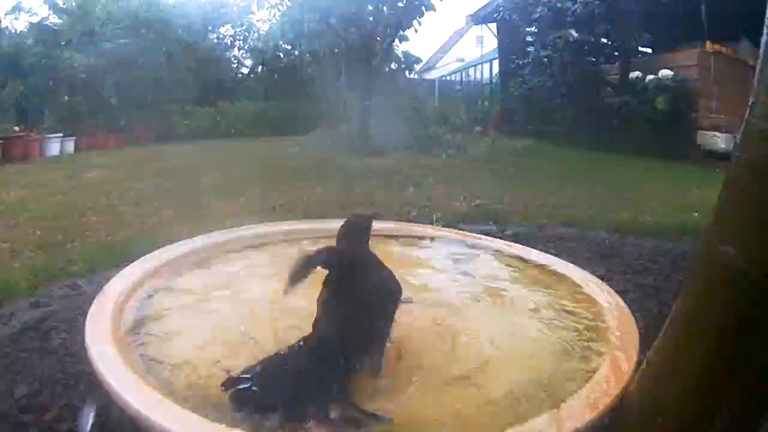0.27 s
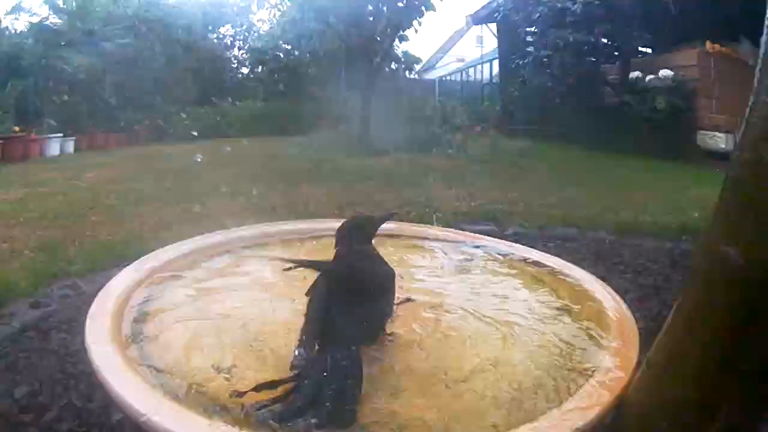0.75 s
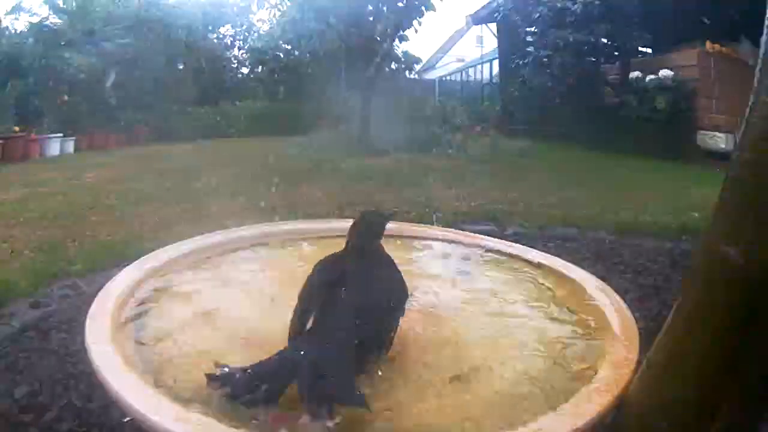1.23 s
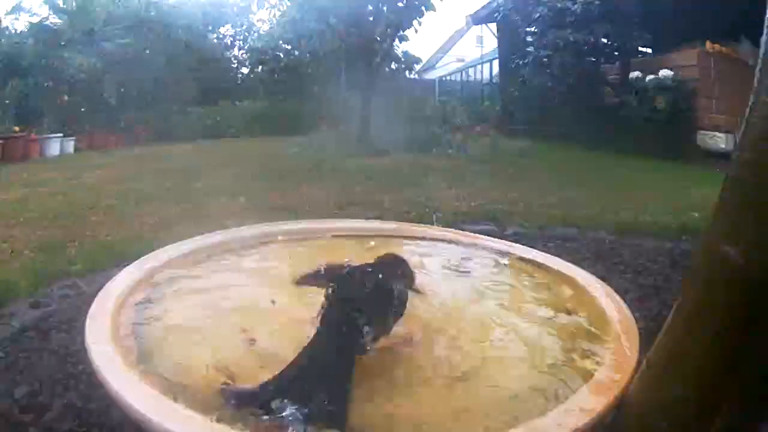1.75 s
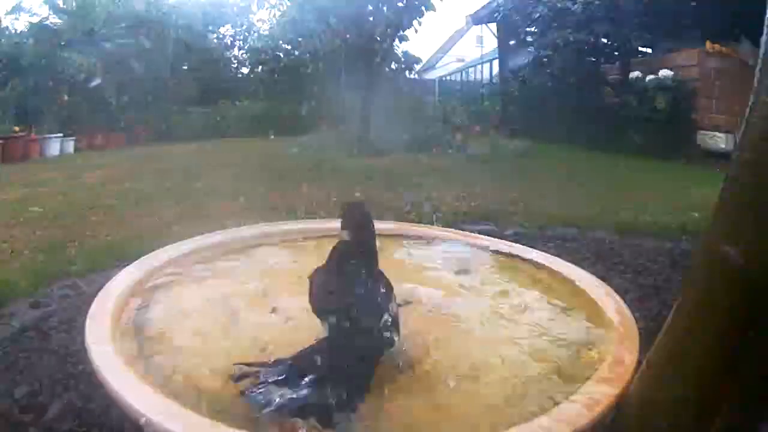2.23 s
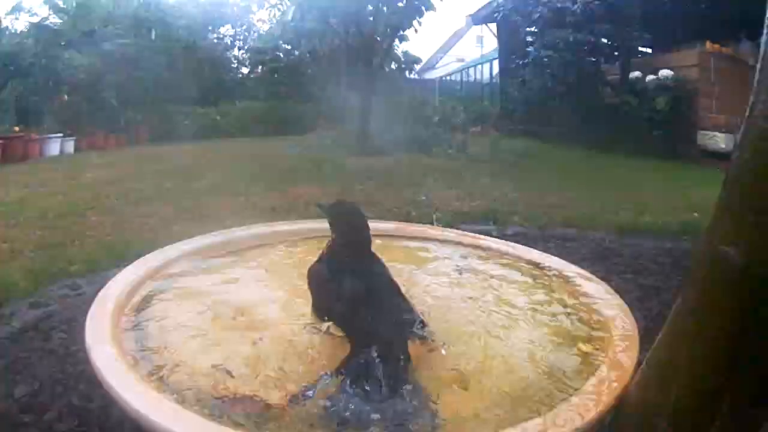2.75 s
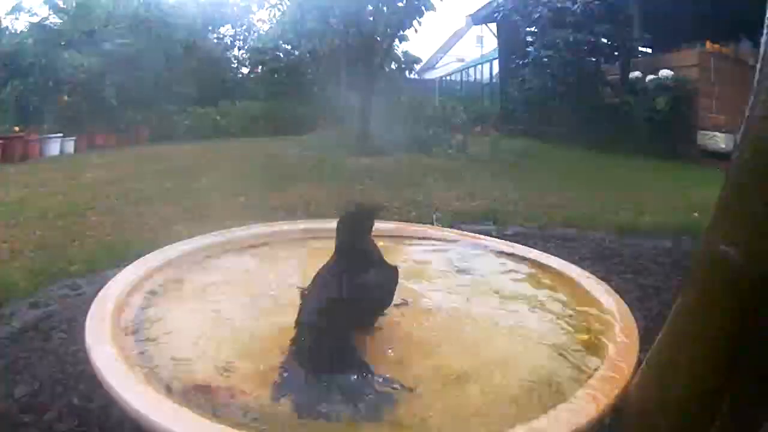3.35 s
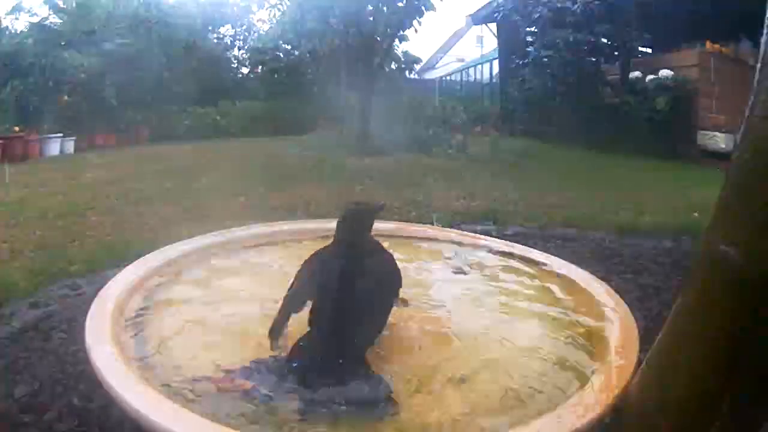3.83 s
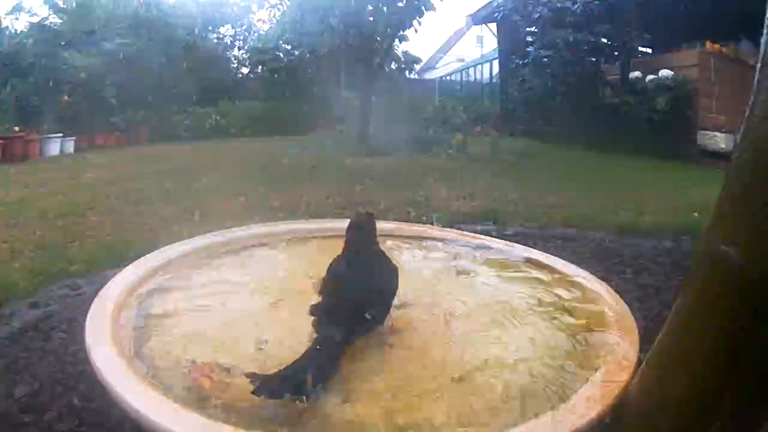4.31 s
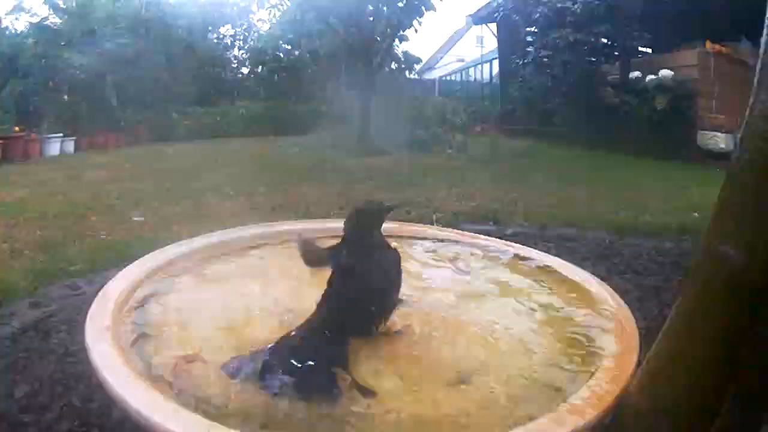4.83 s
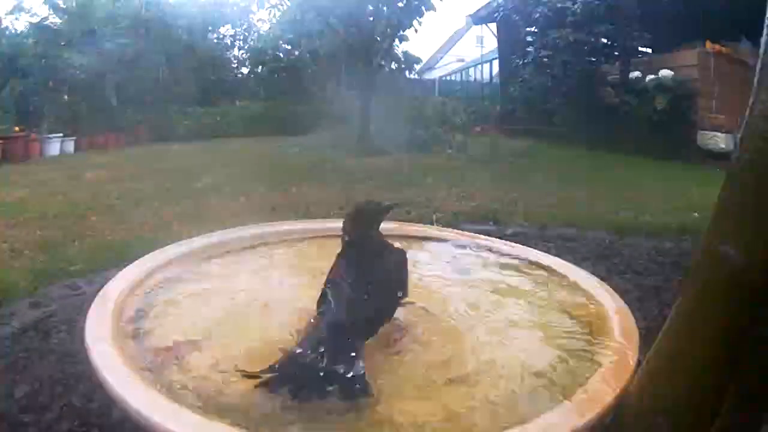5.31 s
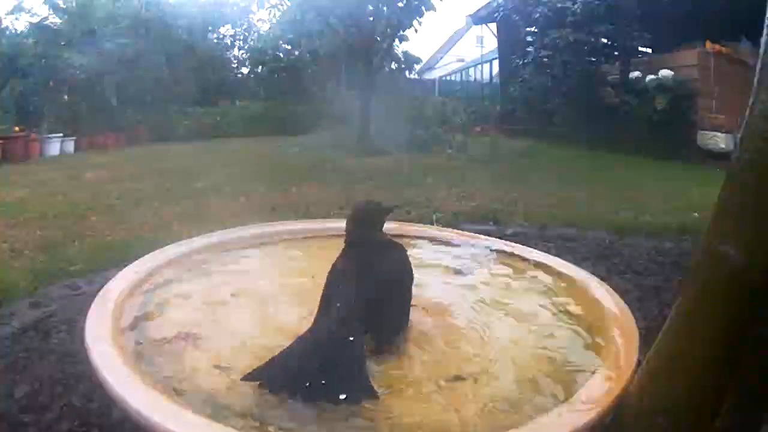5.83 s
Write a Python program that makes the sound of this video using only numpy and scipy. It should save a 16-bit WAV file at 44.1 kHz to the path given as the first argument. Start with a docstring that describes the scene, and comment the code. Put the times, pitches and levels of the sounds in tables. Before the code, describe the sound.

Light rain hisses and patters over a faint low outdoor rumble. Very near, wet feathers beat the water about ten or more times a second, crackling with droplets, pausing briefly, then returning harder with soft puffs of air on the microphone and six clipped, rough chirps. A short lull holds one dull tap of a drop on the housing before a last lighter flurry fades into rain.

```python
"""A shallow dish in a garden, in light rain, with a small outdoor camera's microphone close by.
A dark bird bathes: wet wings slap (shaped noise bursts), throw spray (clumpy noise), push air at
the microphone (single pressure swings) and leave bubbles (rising damped sines). It gives short
two-voiced 'chook' calls (two gliding sines that couple). Rain hisses and patters behind, one drop
hits the housing, and a low rumble with a faint hum lies in the distance."""
import sys
import numpy as np
from scipy import signal
from scipy.fft import rfft, irfft
from scipy.io import wavfile
from scipy.ndimage import uniform_filter1d

SR = 44100
rng = np.random.default_rng(int(sys.argv[2]) if len(sys.argv) > 2 else 0)


def store_pcm(level_fs):
    """Save levels as 16-bit WAV."""
    pcm = np.round(np.clip(level_fs, -1, 1) * 32767).astype(np.int16)
    wavfile.write(sys.argv[1], SR, np.atleast_2d(pcm).T)


def voltage_ratio(level):
    """Linear amplitude factor for a level in decibels (scalar or array-like)."""
    return 10 ** (np.asarray(level, float) / 20)


N = 267246  # samples

# Wing slaps: t/s, level/dB of the slap's energy packed into 1 ms, centre f/Hz, spread/octaves, decay/ms
SLAPS = [(.113, -26, 4920, 0.56, 5), (0.1327, -34, 5000, .7, 0.69), (.202, -18.5, 5670, 0.75, 8),
         (0.213, -28.5, 4150, 1.6, 2.1), (.297, -26, 4250, 0.61, 1.5), (0.3758, -19, 4900, 0.23, 3),
         (0.3866, -27.5, 6030, .7, 4.5), (0.4222, -27.5, 2650, 2.3, 2.6), (0.4572, -21, 4900, 1.1, 1.4),
         (.4779, -18, 5510, 0.79, 0.67), (0.4822, -20.5, 5500, 0.54, 5.9), (0.5817, -23.5, 4690, 1.4, 6.3),
         (0.6775, -20.5, 5250, .7, 4.9), (0.783, -28, 5900, 0.58, 2.2), (0.787, -26.5, 5370, 1.1, 0.8),
         (.885, -27, 4580, 0.87, 0.84), (0.9264, -31.5, 2200, 0.89, 1.2), (0.99, -26.5, 2470, 0.5, .55),
         (1.1204, -23, 4850, 1.2, 2.7), (1.211, -18.5, 4570, 0.69, 1.1), (1.2176, -26, 4100, 0.84, 0.54),
         (1.276, -28.5, 2970, 1, 2.7), (1.2835, -22.5, 5000, 0.6, .9), (1.2901, -23, 5230, 0.64, 3.6),
         (1.309, -20, 5070, 0.57, 0.49), (1.312, -23.5, 5290, .65, 6.1), (1.372, -29, 3850, 1.8, 4.9),
         (1.394, -26, 6090, 0.48, 1.2), (1.398, -28.5, 5120, 0.34, 1.5), (1.4215, -24, 3950, 0.63, 2.7),
         (1.4344, -30.5, 4300, 0.19, 4.9), (1.5111, -29.5, 4000, 0.38, .55),
         (1.8119, -26.5, 5290, 0.37, 0.92), (1.8969, -28, 3050, 0.48, .55), (2.0781, -26, 4920, 0.6, 2.4),
         (2.1597, -26, 3680, 0.64, 1.2), (2.175, -25.5, 5150, 0.24, 2.2), (2.2385, -25.5, 5300, .2, 3.5),
         (2.2453, -18.5, 5460, 0.22, 1.2), (2.265, -18.5, 4100, 0.49, 3.8), (2.333, -32, 4660, 0.59, 1.3),
         (2.348, -13, 3960, 1, 0.31), (2.364, -37, 4980, 0.77, 3.2), (2.4175, -24, 5600, 0.23, 2),
         (2.4304, -13, 4320, 1, 1.2), (2.4358, -24, 5600, 0.87, 6.2), (2.509, -13.5, 4560, 0.87, 1.5),
         (2.592, -15, 4040, 0.39, 0.26), (2.5955, -25.5, 5480, 0.93, 2.1), (2.604, -30, 4970, 0.63, 1.6),
         (2.674, -13, 4340, 0.48, 0.76), (2.7623, -18, 4620, 1.2, 3.1), (2.8627, -25, 3560, 0.5, 5.5),
         (2.9872, -26.5, 4260, 0.85, 2.8), (2.992, -23.5, 4300, 0.99, 1.6),
         (3.0706, -17.5, 3260, 0.8, 0.89), (3.075, -20.5, 5130, 0.66, 4.8), (3.087, -19, 4340, 0.77, 1.4),
         (3.11, -30, 1930, 0.51, 1.6), (3.1506, -11, 5540, 1.03, 2.1), (3.1979, -27.5, 4420, 0.32, 1.9),
         (3.2266, -21, 2200, 0.66, 1.4), (3.2342, -14, 5540, 0.88, 3), (3.3231, -18.5, 4900, 0.76, 2.4),
         (3.407, -23, 4900, 1.1, 5), (3.4138, -14.5, 7370, 0.42, 0.64), (3.5078, -18, 4530, 0.82, 0.63),
         (3.5094, -20.5, 4370, .75, 1.5), (3.5327, -30.5, 2370, 0.59, 1.1), (3.8948, -23, 6280, 0.21, 0.61),
         (4.26, -30.5, 1480, 1.2, 1.2), (4.3368, -23, 6500, 0.6, 2), (4.367, -22.5, 3350, 0.26, 2.1),
         (4.4148, -30, 5960, 0.18, .55), (4.5154, -32, 2810, 0.47, 1.3), (4.5995, -18, 4860, 0.94, 2.8),
         (4.6693, -20.5, 5600, 0.51, .55), (4.6911, -23, 4590, .6, 3.7), (4.697, -20.5, 5460, 0.7, 5.9),
         (4.7817, -17, 3780, 0.66, .55), (4.7902, -29, 3630, 0.49, 4.4), (4.8824, -22, 3900, 1.2, 3.5),
         (4.893, -19, 5940, 0.11, 0.6), (4.9965, -28.5, 4400, 1.8, 1.5), (5.0045, -28, 4510, 0.3, 1.2),
         (5.0188, -25.5, 3150, 1.5, 2.4), (5.1102, -20, 3900, 0.85, 1.9), (5.217, -21, 5570, 0.46, 4.3),
         (5.3394, -23.5, 5500, 0.65, 2.6), (5.347, -23.5, 5380, 0.12, .55), (5.3584, -28.5, 3470, 1.2, 1.9),
         (5.478, -29, 4610, 1.5, 1.9), (5.4889, -28.5, 5180, 0.18, 0.65), (5.7062, -26.5, 2510, 0.43, 1.2)]
# The shallow water favours some bands of every slap: f/Hz, relative level/dB
SLAP_COLOUR = [(300, 9), (900, 1), (1800, 4), (3500, -2), (6000, 0.5), (8000, 3)]
RISE_SHARE, SHORTEST_DECAY_MS = .16, .52  # rise time as a share of the decay
# Levels of the three wet parts are energies against their slap
SWISH_DB, SWISH_MS = -12.5, 8.7  # feathers cutting air and water just before the slap
SPRAY_DB, SPRAY_MS, SPRAY_HZ = -12, 6.9, 5370
DRIZZLE_DB, DRIZZLE_MS = -16.5, 49  # thrown water goes on falling a while
PATCHY_DB, PATCH_MS = 5, 1.2  # spray falls in uneven clumps

# Air pushed at the microphone by a wing stroke: t/s mid-swing, nominal level/dB, dip to swell about/ms
WAFTS = [(0.116, -37, 4), (0.295, -39, 3.7), (0.419, -37, 3.6), (2.081, -37, 5), (2.266, -36.5, 2.1),
         (2.348, -39, 4.1), (2.431, -31.5, 2.7), (2.51, -30, 1.97), (2.59, -28, 1.3), (2.673, -31, 3.5),
         (2.76, -35, 3.8), (3.07, -34.5, 2.06), (3.085, -30.5, 1.96), (3.102, -29, 2.4),
         (3.152, -33.5, 3.3), (3.406, -30.5, 4.4), (4.781, -36, 4), (4.882, -41, 2.6), (5.218, -37.5, 1.95)]
SLOSH_DB, SLOSH_HZ, SLOSH_MS = -12.5, 750, 4.4  # water heaved by the same stroke; dB against the waft

# Bubbles ringing in the water: t/s, level/dB before the soft onset, starting f/Hz
BUBBLES = [(0.9898, -30, 2220), (1.216, -27, 3120), (1.269, -25, 3520), (1.277, -25, 2190),
           (1.302, -28, 2540), (1.894, -27, 3830), (2.2426, -27, 2540), (2.264, -19.5, 2990),
           (2.462, -23.5, 2390), (2.805, -30, 3800), (3.108, -19.5, 1500), (3.2252, -17, 1530),
           (4.3678, -28, 3050), (4.691, -25, 2160), (4.8254, -29, 1870), (5.0765, -30.5, 1260),
           (5.3582, -29, 3170), (5.7054, -29.5, 2400)]
BUBBLE_T60_S, BUBBLE_RISE = 0.02, 0.16  # pitch climbs by this share over t60

# Calls: t/s near the top of the lower sweep, level/dB before effort and throat, lower f/Hz at share 1,
# upper f/Hz at share 1, closing flick f/Hz, throat resonance f/Hz
CALLS = [(0.0565, -26.5, 2937, 3770, 3280, 2962), (2.482, -33.5, 2564, 3300, 1750, 2340),
         (2.698, -29.5, 3150, 3450, 2450, 2260), (2.870, -28.5, 2603, 3115, 1450, 2480),
         (3.0536, -26.5, 2664, 2827, 2030, 2460), (3.203, -25, 2726, 3580, 2160, 2500),
         (3.366, -25.5, 2980, 3077, 3000, 2560)]
# Sweep of each side in every call: t/ms from the call's time, share of the way from rest to top, effort level/dB
LOWER_SWEEP = [(-8.5, 0.115, -19), (-5, 0.489, -3.5), (-1.5, 0.878, -1.5), (0.5, 0.98, -1.5),
               (1.5, 0.882, -3), (5, 0.53, 2.5), (9, .2, -6.5), (13.5, .03, -17)]
UPPER_SWEEP = [(-2.5, .6, -10), (3, 0.94, -0.5), (4.5, 0.824, -2), (8.5, 0.47, -7.5), (13, .22, 0),
               (17.5, 0.092, -10.5)]
LOWER_REST_HZ, UPPER_REST_HZ = 1082, 1500
FLICK_MS, FLICK_DB = 22.5, -15  # the upper side flicks, mostly upward, as it closes
# coupling lifts the upper side in mid fall; the lift in Hz is this times the coupling gain
WAVER_HZ, WAVER_MS, WAVER_WIDTH_MS = 3360, 10.8, 2.8
THROAT_WIDTH_HZ, THROAT_DB = 406, 8.5  # a sweep swells as it crosses the resonance
# the sides couple more strongly the wider the beak, that is the higher the resonance
COUPLING_DB, COUPLING_DB_PER_KHZ, COUPLING_AT_HZ = -24.5, 24.5, 2480
AIR_DB, AIR_HZ = -24.5, 4100  # air noise through the beak
JITTER, RASP_DB = .01, 1.8  # fast unsteadiness of pitch (share) and of level

# Drop that hits the camera housing: t/s, push level/dB before recovery, push/ms, recovery f/Hz
HOUSING_DROPS = [(4.2884, -16.5, 1.05, 130)]

# Rain at the microphone: t/s, level/dB
RAIN = [(0.0, -42), (3.0, -42.5), (6.06, -42.5)]
# Spectrum of the far hiss: f/Hz, relative level/dB per Hz
RAIN_COLOUR = [(290, -44.5), (500, -10.5), (900, -2.5), (1600, -2.5), (3000, -3), (6100, -5), (7000, -5.5)]
PATTER_PER_S, PATTER_DB, PATTER_SCATTER_DB = 500, -6.5, 5  # patter level against the hiss
LOUDEST_SHARE = .09  # caps the largest drops

# Spectrum of the distant rumble: f/Hz, relative level/dB per Hz
RUMBLE_COLOUR = [(12, -44), (20, -2), (70, 3), (151, -3.5), (199, -6.5), (248, -6), (376, -10.5),
                 (800, -11.5), (1040, -34), (1760, -120)]
RUMBLE_DB = -52.5
HUM_HZ, HUM_WIDTH_HZ, HUM_DB = 198.4, 3.2, -63

ECHO_DB, ECHO_T60_S = -18, .05
# Roll-off of the camera's narrow audio band: f/Hz, level/dB
MIC_TOP = [(6500, 1), (7050, -0.5), (7750, -3), (8200, -11.5), (8600, -18), (9000, -36.5), (9250, -57),
           (9700, -75), (10500, -100)]


def splashes():
    """A swish, a crackling slap, then finer spray falling back: noise under separate envelopes."""
    out = np.zeros(N)
    t = np.arange(-768, 5376) / SR * 1000  # ms from the slap
    before, after = np.minimum(t, 0), np.maximum(t, 0)
    swish = unit(np.exp(before / SWISH_MS) * (t < 0))
    spray = unit(after * np.exp(-(after / SPRAY_MS) ** 2))
    drizzle = unit(after * np.exp(-after / DRIZZLE_MS * 2))
    wet = voltage_ratio(SPRAY_DB) * spray + voltage_ratio(DRIZZLE_DB) * drizzle + voltage_ratio(SWISH_DB) * swish
    for s, db, hz, octaves, decay_ms in SLAPS:
        noise, crackle, mist = rng.standard_normal((3, len(t)))
        decay_ms = max(decay_ms, SHORTEST_DECAY_MS)
        # droplets build up quickly and stop fairly abruptly
        shape = np.exp(-(before / (RISE_SHARE * decay_ms)) ** 2 - (after / decay_ms) ** 1.27)
        burst = (noise * voltage_ratio(2.5 * crackle) * shape)[:2048]
        slap = band(even(burst), hz, max(octaves, .1))
        clumps = uniform_filter1d(crackle[::-1], int(PATCH_MS * SR / 1000))
        patches = voltage_ratio(PATCHY_DB * clumps / np.std(clumps))
        fine = band(mist * patches, SPRAY_HZ, 0.88)
        gain = voltage_ratio(db) * np.sqrt(SR / 1000)  # unit energy to rms over 1 ms
        start = s + t[0] / 1000
        add(out, start, gain * unit(colour(slap, SLAP_COLOUR)))
        add(out, start, gain * wet * fine / np.std(fine))
    return out


def wafts():
    """A dip then a swell of pressure as the wing sweeps past, and a dull slosh of the water it heaves."""
    out = np.zeros(N)
    t = np.arange(2048) / SR * 1000  # ms
    swell = t / SLOSH_MS * np.exp(1 - t / SLOSH_MS)
    slosh_band = signal.butter(1, [SLOSH_HZ * 0.52, SLOSH_HZ * 1.8], "band", fs=SR)
    for s, db, ms in WAFTS:
        u = np.arange(-4 * ms, 4 * ms, 1000 / SR) / ms
        push = 2.3 * u * np.exp(-u ** 2 * 2) * (1 - .3 * u)  # the dip is deeper than the swell
        add(out, s - 4 * ms / 1000, voltage_ratio(db) * push)
        water = signal.lfilter(*slosh_band, rng.standard_normal(len(t)))
        add(out, s - ms / 1000, voltage_ratio(db + SLOSH_DB) * water / np.std(water) * swell)
    return out


def bubbles():
    """Damped sines that climb as the bubble nears the surface."""
    out = np.zeros(N)
    t = np.arange(1800) / SR
    onset = 1 - np.exp(-t / 0.00079)
    ring = onset * np.exp(-np.log(1000) * t / BUBBLE_T60_S)
    for s, db, hz in BUBBLES:
        phase = 2 * np.pi * hz * (t + BUBBLE_RISE * t ** 2 / (2 * BUBBLE_T60_S))
        add(out, s, voltage_ratio(db) * ring * (np.sin(phase) + 0.09 * np.sin(2 * phase)))
    return out


def calls():
    """Two sides sweep up and down, overlap and beat; coupling adds their sum tone and weak octaves."""
    out = np.zeros(N)
    for s, db, low_hz, high_hz, flick_hz, throat_hz in CALLS:
        coupling = voltage_ratio(COUPLING_DB + COUPLING_DB_PER_KHZ * (throat_hz - COUPLING_AT_HZ) / 1000)
        upper_shape = upper_side(high_hz, flick_hz, coupling)
        t = s + np.arange(-640, 1560) / SR
        a, p = voice(sweep(s, db, LOWER_SWEEP, LOWER_REST_HZ, low_hz, throat_hz), t)
        b, q = voice(sweep(s, db, upper_shape, UPPER_REST_HZ, high_hz, throat_hz), t)
        sum_tone = 2 * np.sqrt(a * b) * np.sin(p + q)
        octaves = 0.4 * a * np.sin(2 * p) + 0.32 * b * np.sin(2 * q)
        air = band(rng.standard_normal(len(t)), AIR_HZ, 0.68)
        beak = voltage_ratio(AIR_DB) * (a + b) * air / np.std(air)
        add(out, t[0], a * np.sin(p) + b * np.sin(q) + coupling * (sum_tone + octaves) + beak)
    return out


def upper_side(high_hz, flick_hz, coupling):
    """Upper side's sweep rows (t/ms, share, effort/dB) with its closing flick and the coupling's lift."""
    span = high_hz - UPPER_REST_HZ
    flick = (FLICK_MS, (flick_hz - UPPER_REST_HZ) / span, FLICK_DB)
    ms, share, effort_db = np.transpose(UPPER_SWEEP + [flick])
    fine = np.arange(ms[0], ms[-1], .5)
    lift = coupling * WAVER_HZ / span * np.exp(-((fine - WAVER_MS) / WAVER_WIDTH_MS) ** 2)
    return np.transpose([fine, np.interp(fine, ms, share) + lift, np.interp(fine, ms, effort_db)])


def sweep(s, db, shape, rest_hz, top_hz, throat_hz):
    """Rows (t/s, f/Hz, level/dB) of one side's sweep as heard through the throat's resonance."""
    ms, share, effort_db = np.transpose(shape)
    fine = np.arange(ms[0], ms[-1], .25)
    hz = rest_hz + (top_hz - rest_hz) * np.interp(fine, ms, share)
    throat_db = THROAT_DB * np.exp(-((hz - throat_hz) / THROAT_WIDTH_HZ) ** 2)
    return np.transpose([s + fine / 1000, hz, db + np.interp(fine, ms, effort_db) + throat_db])


def voice(rows, t):
    """One side of the syrinx: amplitude and phase of a slightly raspy gliding sine."""
    s, hz, db = np.transpose(rows)
    wobble = 1 + JITTER * unsteady(len(t))
    glide = uniform_filter1d(np.interp(t, s, hz), size=70)
    phase = 2 * np.pi * np.cumsum(glide * wobble) / SR
    fade = np.clip(np.minimum(t - s[0] + 0.0012, s[-1] + 0.0033 - t) / 0.0024, 0, 1)
    rasp = RASP_DB * unsteady(len(t))
    return voltage_ratio(uniform_filter1d(np.interp(t, s, db), size=70) + rasp) * fade, phase


def unsteady(count):
    """Smoothed noise of spread near 1, varying within a millisecond."""
    return 5 * np.convolve(rng.standard_normal(count), np.hanning(36) / 18, "same")


def housing_drops():
    """A short one-sided push; the diaphragm swings back and settles."""
    out = np.zeros(N)
    t = np.arange(1000) / SR
    for s, db, ms, hz in HOUSING_DROPS:
        push = np.sin(np.pi * np.clip(t * 1000 / ms, 0, 1))
        add(out, s, voltage_ratio(db) * signal.lfilter(*signal.butter(1, hz, "high", fs=SR), push))
    return out


def rain():
    """Far hiss plus near drops: each a few cycles at its own pitch, a few much louder than the rest."""
    when, pitch, cycles, size = rng.random((int(PATTER_PER_S * N / SR), 4)).T
    patter, t = np.zeros(N), np.arange(300) / SR
    hz = 700 * (8500 / 700) ** pitch ** .6
    gain = voltage_ratio(-PATTER_SCATTER_DB * np.log(size + LOUDEST_SHARE)) * np.sqrt(hz / 3000)
    decay_per_s = hz / (0.24 + 4.3 * cycles ** 2)
    drops = gain[:, None] * np.exp(-t * decay_per_s[:, None]) * np.sin(2 * np.pi * hz[:, None] * t)
    for s, drop in zip(when * N / SR, drops):
        add(patter, s, drop)
    flicker_db = 0.34 * walk(25.3) + 1.1 * walk(150)
    hiss = level(colour(rng.standard_normal(N), RAIN_COLOUR), 0) * voltage_ratio(flicker_db)
    return level(hiss + level(patter, PATTER_DB), 0) * voltage_ratio(curve(RAIN))


def rumble():
    """Low outdoor rumble (coloured noise) that flutters, and a faint wavering hum (narrow noise band)."""
    low = level(colour(rng.standard_normal(N), RUMBLE_COLOUR), 0) * voltage_ratio(RUMBLE_DB + 1.3 * walk(17))
    edges = [HUM_HZ - HUM_WIDTH_HZ / 2, HUM_HZ + HUM_WIDTH_HZ / 2]
    narrow = signal.butter(1, edges, "band", fs=SR, output="sos")
    hum = signal.sosfilt(narrow, rng.standard_normal(N))
    return low + level(hum, HUM_DB)


def level(x, db):
    """Scale to an rms level."""
    return x * voltage_ratio(db) / np.sqrt(np.mean(x ** 2))


def unit(x):
    """Scale to unit energy."""
    return x / np.linalg.norm(x)


def curve(rows):
    """Straight lines through (t/s, value) rows."""
    return np.interp(np.arange(N) / SR, *np.transpose(rows))


def spectrum_hz(x):
    """Frequency of each bin of x's spectrum, at least 1 Hz."""
    return np.maximum(np.arange(len(x) // 2 + 1) * SR / len(x), 1)


def colour(x, points):
    """Filter by a (f/Hz, level/dB) spectrum, straight on a log frequency axis."""
    hz, db = np.transpose(points)
    gain = voltage_ratio(np.interp(np.log(spectrum_hz(x)), np.log(hz), db))
    return irfft(rfft(x) * gain, len(x))


def band(x, hz, octaves):
    """Bell-shaped pass band on a log axis, with low skirts."""
    bell = np.exp(-(np.log2(spectrum_hz(x) / hz) / octaves) ** 2 / 4)
    return irfft(rfft(x) * (bell + .11), len(x))


def even(x):
    """Partly level out broad chance bumps in a short burst's spectrum."""
    bins = rfft(x)
    return irfft(bins / uniform_filter1d(np.abs(bins) ** 2, size=70) ** 0.48, len(x))


def add(out, s, x):
    """Mix x into out from time s."""
    k = int(s * SR)
    out[k:k + len(x)] += x[:N - k]


def walk(rate):
    """Random levels, a new one every 1 / rate s, joined by slopes; spread about 0.7."""
    k = int(SR / rate)
    held = np.repeat(rng.standard_normal(N // k + 1), k)
    return 0.9 * uniform_filter1d(held, k)[:N]


def scene():
    """The dish and the wall behind the camera give the bird a short scatter of echoes."""
    bird = splashes() + bubbles() + calls()
    t = np.arange(4000) / SR
    tail = rng.standard_normal(len(t)) * np.exp(-np.log(1000) * t / ECHO_T60_S)
    echo = signal.fftconvolve(bird, unit(tail))[:N]
    return (bird + voltage_ratio(ECHO_DB) * echo + wafts() + housing_drops() + rain() + rumble())[None]


def low_pass(x):
    """Removes everything above the highest recorded frequency."""
    return signal.sosfilt(signal.butter(12, 9140, fs=SR, output="sos"), x)


def record(dry):
    """The camera's microphone keeps next to nothing above its narrow audio band."""
    mix = colour(dry[0], MIC_TOP)[None]
    return low_pass(mix)


dry = scene()
out = record(dry)
store_pcm(out)
```